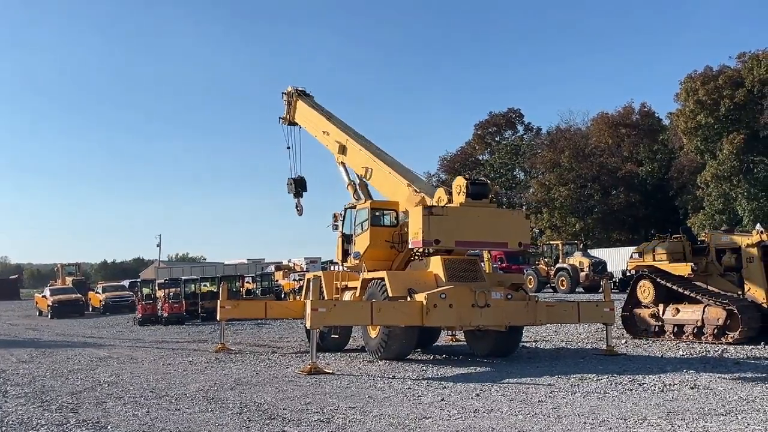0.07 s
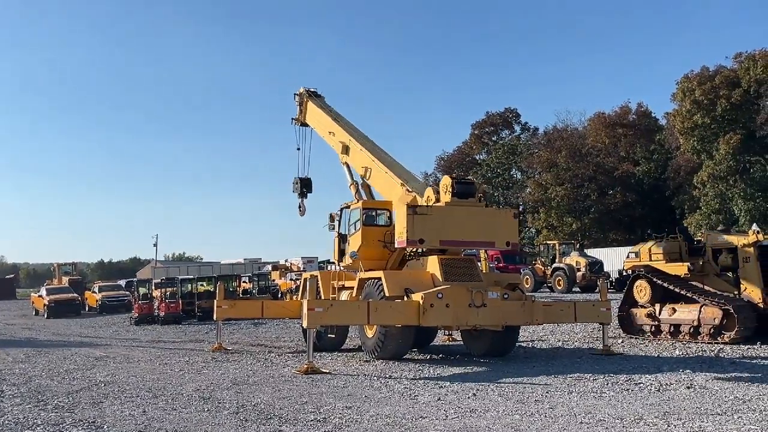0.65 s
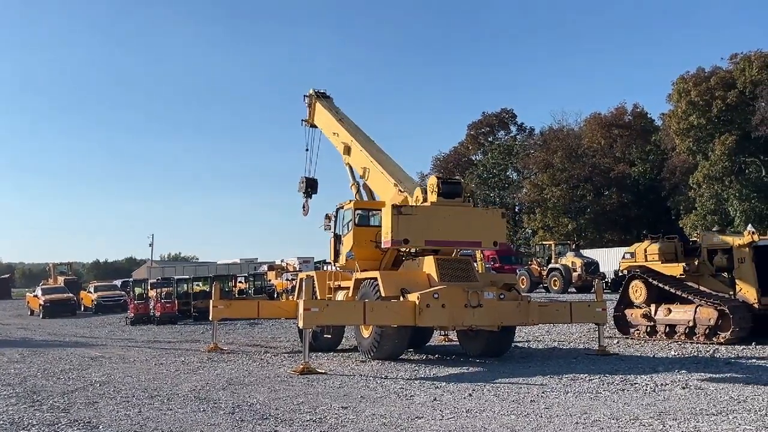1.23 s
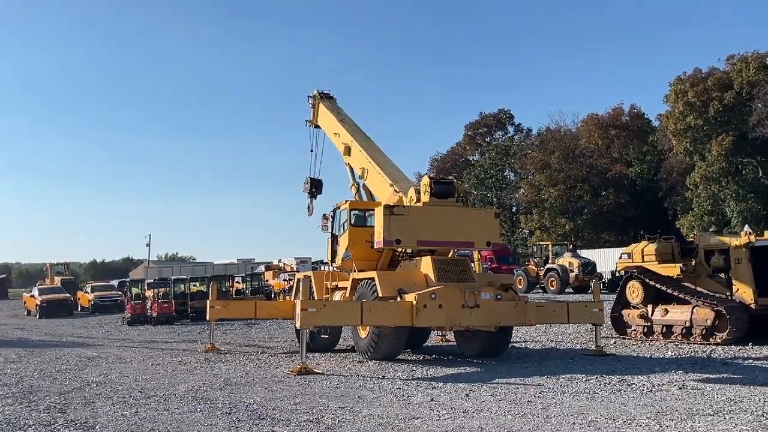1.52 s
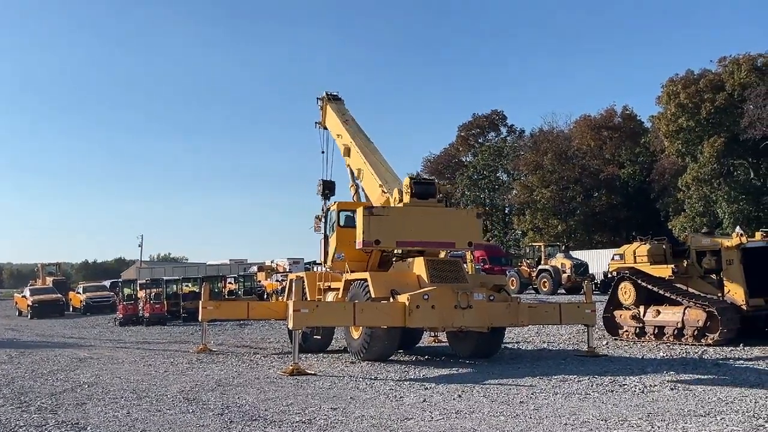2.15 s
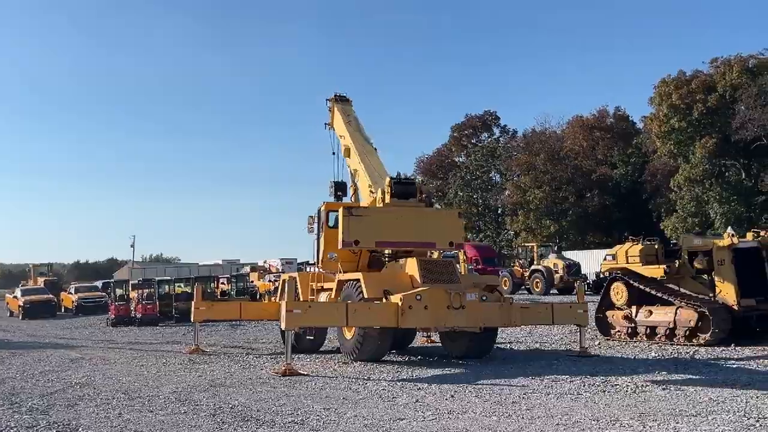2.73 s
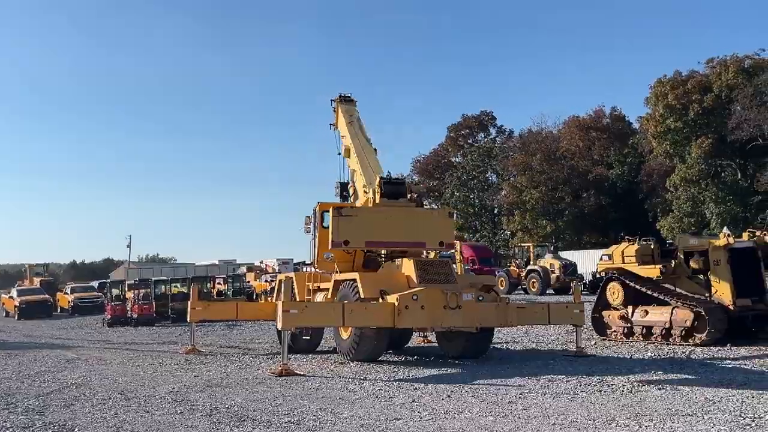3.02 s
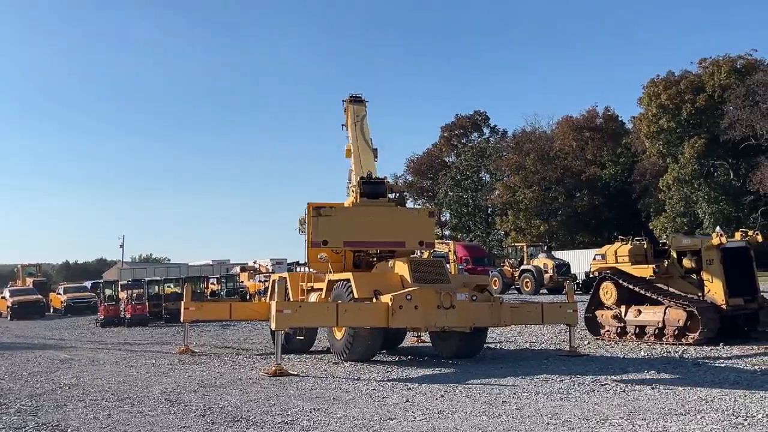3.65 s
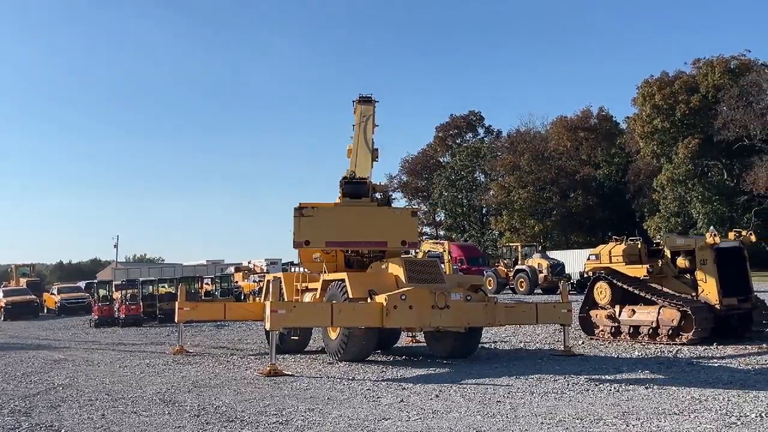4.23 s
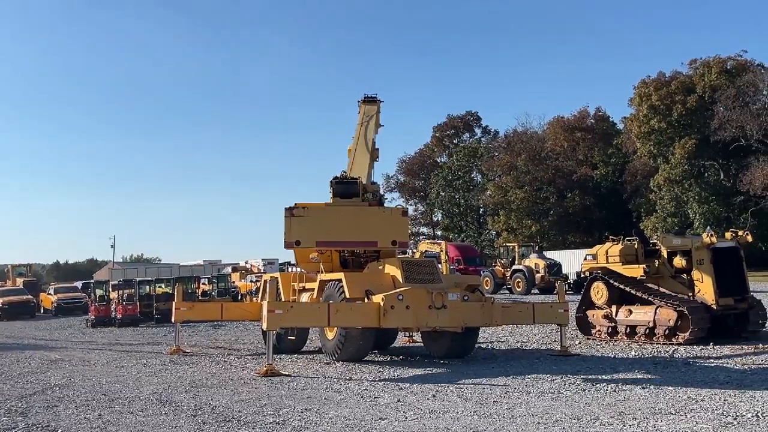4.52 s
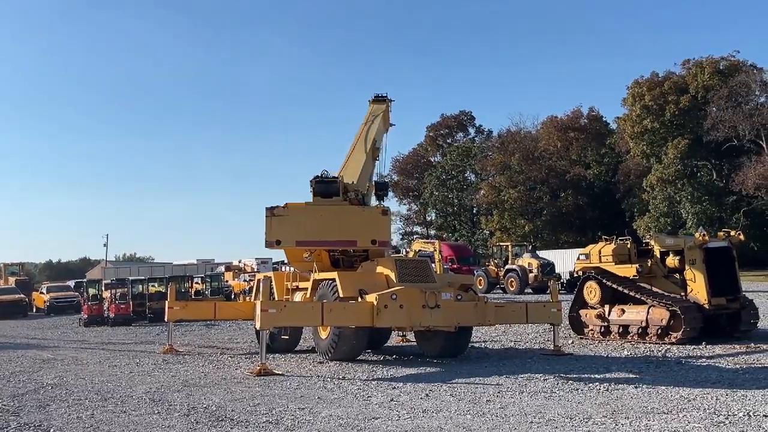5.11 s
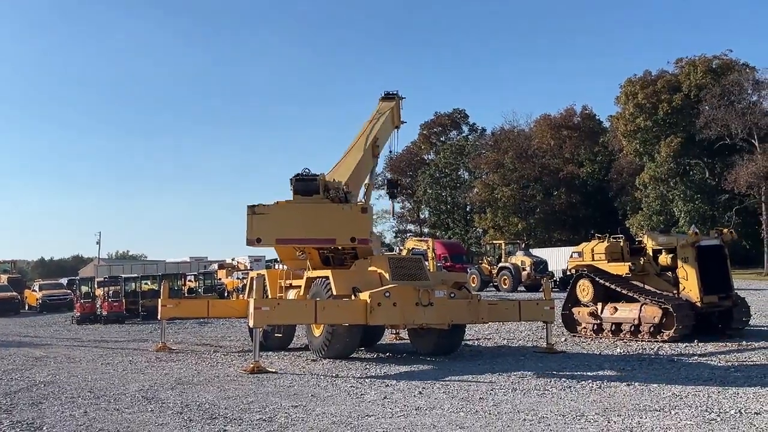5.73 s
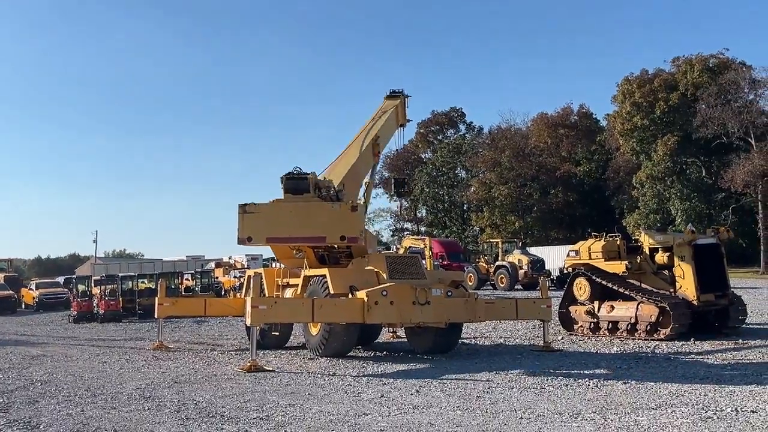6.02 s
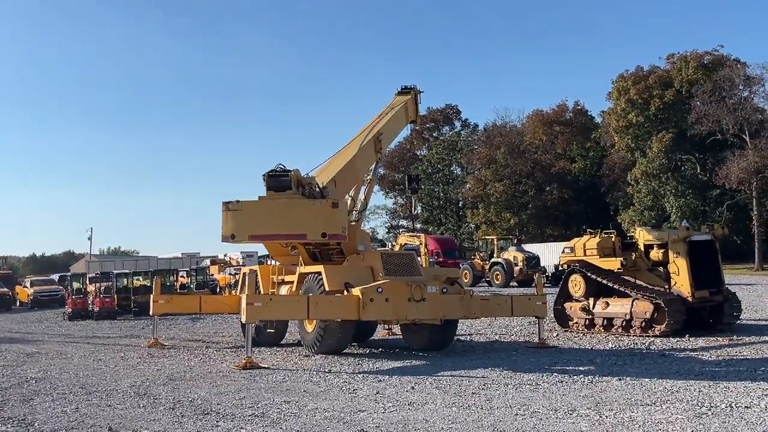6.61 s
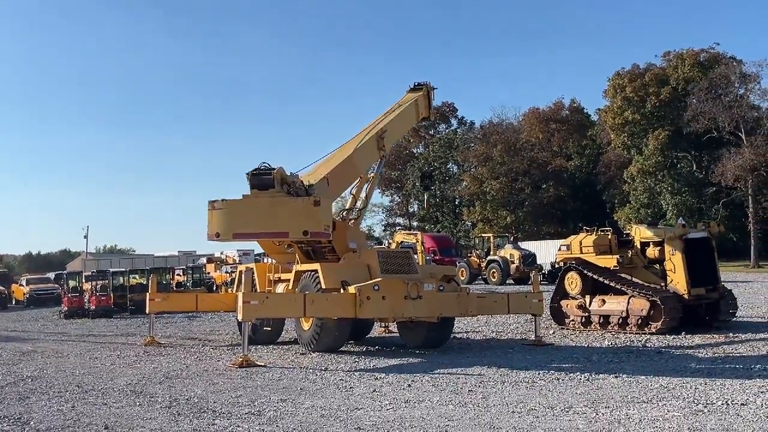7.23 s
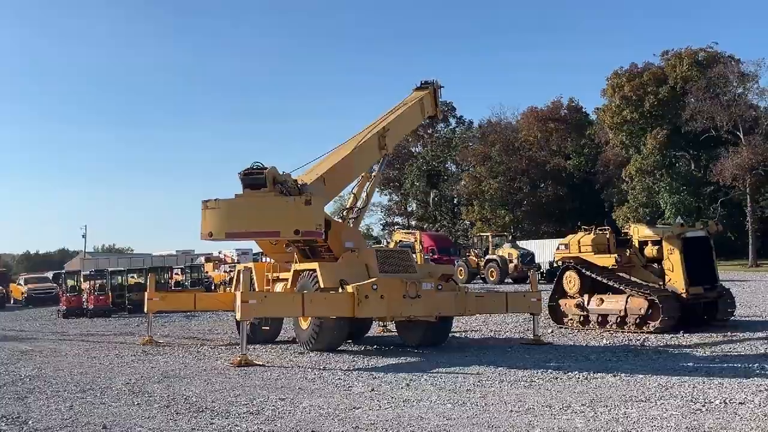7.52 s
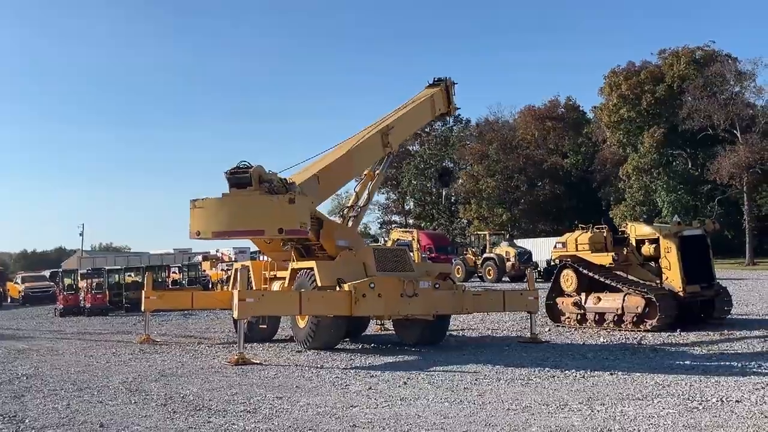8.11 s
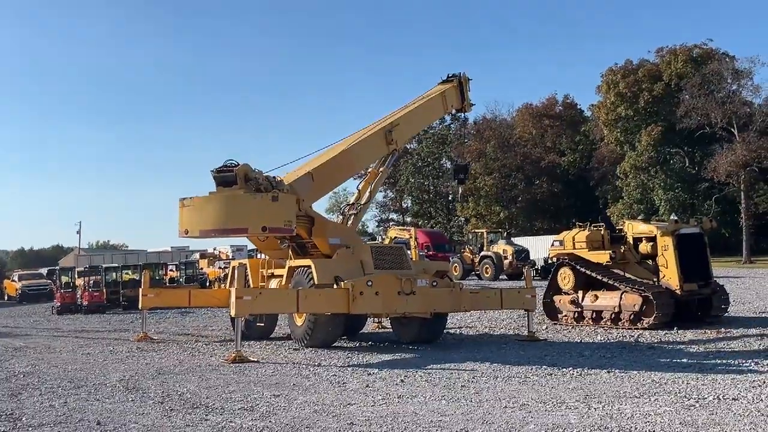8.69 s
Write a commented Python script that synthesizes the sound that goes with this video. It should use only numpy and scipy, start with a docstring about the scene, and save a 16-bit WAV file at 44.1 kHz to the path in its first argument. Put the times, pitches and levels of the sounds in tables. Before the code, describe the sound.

A mobile crane's diesel engine is already running at the start, with a deep exhaust drone and a fast metallic knocking clatter. Its pitch rises gradually, mostly over the first 3 seconds, creeps a little higher until about 5.5 seconds, then holds to the end at nearly 9 seconds. The drone is loudest in the first 1.5 seconds, weakest around 4 seconds, and partly returns by 6 seconds. A thin, high hydraulic whine climbs with the engine, swelling from about 2 seconds and peaking near 3.5 seconds. It stays prominent until 5 seconds, then recedes unevenly and is faint by 8 seconds. Underneath run a fan and pump hum, steady rushing air, a faint oil hiss and a slight ring from a metal cover. The pump hum grows a little in the last second. The place is an open yard with a short, weak echo.

```python
"""In an open gravel yard, a mobile crane swings round while its diesel speeds up, then holds its speed.
One crankshaft (the engine's main shaft) drives everything: six cylinders fire in turn, making the
exhaust drone and the engine block knock, while the cooling fan and the oil pump hum.
The pump's gears add a thin whine that swells as the deck turns. Behind it all, air rushes,
oil hisses in a valve and a metal cover rings."""
import sys
import numpy as np
from scipy import signal
from scipy.fft import rfft, irfft, next_fast_len
from scipy.io import wavfile
from scipy.ndimage import map_coordinates

SR = 44100
rng = np.random.default_rng(int(sys.argv[2]) if len(sys.argv) > 2 else 0)


def output_pcm(signal):
    """Save a mono or channel-first signal as 16-bit PCM at the path in sys.argv[1].

    Samples are clipped to [-1, 1] before scaling.
    """
    pcm = np.clip(np.atleast_2d(signal).T, -1, 1) * 32767
    wavfile.write(sys.argv[1], SR, np.round(pcm).astype(np.int16))


N = 390726

# Crankshaft speed: the throttle opens, then the speed settles. Columns: t/s, speed/(turns per s)
ENGINE_SPEED = [(0.0, 21.189), (0.48, 21.907), (1.1, 22.597), (1.49, 23.235), (2.01, 24.391),
                (2.67, 25.543), (3.45, 26.028), (4.48, 26.414), (5.02, 26.484), (5.55, 26.694),
                (6.94, 26.828), (8.86, 26.912)]
# Exhaust drone: loudest as the engine picks up, weakest in mid-swing. Columns: t/s, level/dB
DRONE_LEVEL = [(0.0, -9.5), (0.05, -13), (0.1, -14.5), (0.15, -11), (1.58, -12.5), (1.75, -14.5),
               (2.49, -15.5), (3.36, -16), (4.12, -21), (5.85, -16), (8.81, -16), (8.86, -16)]
# How hard the engine works, which lifts the knocking and the rush of air. Columns: t/s, level/dB
ENGINE_EFFORT = [(0, -0.2), (1.2, -0.9), (2.3, 1.1), (4, -0.5), (5.6, 0), (7, -0.1), (8.86, -1)]


def amp(db):
    """Turn decibels into a number to multiply a sound by."""
    return 10 ** (np.asarray(db) / 20)


def unit(x):
    """Scale a sound so that its average strength (rms) is 1."""
    return x / np.sqrt(np.mean(x ** 2) + 1e-20)


def along(points, hz):
    """Read a table of (f/Hz, value) at any frequency, on a logarithmic frequency scale."""
    freqs, values = np.transpose(points)
    return np.interp(np.log(hz + 1), np.log(freqs + 1), values)


def curve(rows):
    """Join the rows of a (t/s, value) table with straight lines, one value per sample."""
    return np.interp(np.arange(N) / SR, *np.transpose(rows))


def wobble(rate):
    """A smooth curve through `rate` random values a second."""
    times = np.linspace(0, N / SR, 2000)
    values = rng.standard_normal(1000)
    smooth = map_coordinates(values, [times * rate], mode="mirror")
    return np.interp(np.arange(N) / SR, times, smooth)


def filtered(x, response):
    """Multiply each frequency in a sound by response(hz)."""
    size = next_fast_len(N + SR // 2)
    hz = np.fft.rfftfreq(size, 1 / SR)
    return irfft(rfft(x, size) * response(hz), size)[..., :N]


def coloured(x, spectrum):
    """Shape a sound's bass and treble by a (f/Hz, level/dB) table, then scale it to strength 1."""
    return unit(filtered(x, lambda hz: amp(along(spectrum, hz))))


def noise(spectrum):
    """Fresh noise of strength 1, shaped by a (f/Hz, level/dB) table."""
    return coloured(rng.standard_normal(N), spectrum)


def tone(turns, db, flutter_db, flutter_rate):
    """A pure tone, one wave per turn of a spinning part, whose level flutters at random."""
    gain = amp(db + flutter_db * wobble(flutter_rate))
    return np.sqrt(2) * gain * np.sin(2 * np.pi * (turns + rng.random()))


def tones(turns, harmonics, flutter_db, flutter_rate):
    """Harmonics (tones at whole multiples of a turning speed), each fluttering on its own."""
    return sum(tone(k * turns, db, flutter_db, flutter_rate) for k, db in harmonics)


def doublings():
    """Engine speed counted in doublings: 0 at full speed, -1 at half speed."""
    speed = curve(ENGINE_SPEED)
    return np.log2(speed / speed.max())


def boom(per_turn, resonances):
    """The extra dB a tone gains as it slides through resonances, the pitches at which a part rings."""
    pitch = per_turn * curve(ENGINE_SPEED)
    return sum(lift / (1 + (2 * (pitch - hz) / width) ** 2) for hz, width, lift in resonances)


def hum(crank, per_turn, harmonics, resonances, flutter_db, flutter_rate):
    """A part driven by the crankshaft hums, louder with speed and where it meets a resonance."""
    growth_db = 17 * doublings()
    sound = np.zeros(N)
    for k, db in harmonics:
        waves_per_turn = k * per_turn
        level_db = db + growth_db + boom(waves_per_turn, resonances)
        sound += tone(waves_per_turn * crank, level_db, flutter_db, flutter_rate)
    return sound


def yard(x, fade_s=0.12):
    """Gravel and parked machines scatter back a short, weak echo, different on the left and right."""
    # How much sound comes back. Columns: f/Hz, level/dB
    scatter = [(80, -32), (200, -22), (500, -17), (700, -12), (1200, -15), (1700, -7), (2500, -20),
               (5000, -35)]
    t = np.arange(SR // 3) / SR
    tails = rng.standard_normal((2, len(t))) * np.exp(-np.log(1000) * t / fade_s)  # 60 dB down at fade_s
    echoes = signal.oaconvolve(x[None], tails / np.linalg.norm(tails[0]), axes=1)[:, :N]
    return filtered(echoes, lambda hz: amp(along(scatter, hz)))


def air(base_db=-34.5, effort_share=0.77):
    """Air rushes through the radiator, louder with speed and effort; some treble comes from all around."""
    # Tone colour of the rushing air. Columns: f/Hz, relative level/dB
    rush_colour = [(400, -7.5), (1000, 6), (1700, -3), (2400, 2.5), (2750, 0), (3100, -1.5), (3700, -1),
                   (4800, -3.5), (6700, -9.5), (8500, -18.5), (10500, -21), (14400, -36.5)]
    # The share that reaches each microphone by its own path. Columns: f/Hz, level/dB
    spread = [(2000, -14), (5000, -16), (6500, -9), (10000, -7), (14000, -5)]
    left_right = np.array([noise(rush_colour), noise(rush_colour)])
    around = filtered(left_right, lambda hz: amp(along(spread, hz)))
    flow_db = base_db + 8 * doublings() + effort_share * curve(ENGINE_EFFORT)
    return amp(flow_db + 0.38 * wobble(14)) * (noise(rush_colour) + around)


def valve(centre_hz=3100, width_hz=330, full_speed_db=-46):
    """Oil squeezed through a valve hisses in one narrow band, much louder as the pump speeds up."""
    hiss = filtered(rng.standard_normal(N), lambda hz: 1 / (1 + (2 * (hz - centre_hz) / width_hz) ** 2))
    return amp(full_speed_db + 35 * doublings() + 1.2 * wobble(4)) * unit(hiss)


def panel(crank, centre_hz=1340, width_hz=20, db=-40):
    """A sheet-metal cover sings whenever a harmonic of the firing slides through its resonance."""
    ring = np.zeros(N)
    speed = curve(ENGINE_SPEED)
    for per_turn in range(48, 66, 3):  # steps of three: the engine fires three times a turn
        off_pitch = (per_turn * speed - centre_hz) / (width_hz / 2)
        ring += np.sin(2 * np.pi * per_turn * crank - np.arctan(off_pitch)) / np.hypot(1, off_pitch)
    return np.sqrt(2) * amp(db + 2.4 * wobble(6.6)) * ring


def fan(crank, blades_per_turn=6.593):
    """Passing fan blades hum; the turning deck shields their lowest tone along with the exhaust drone."""
    # The blades' higher tones at full speed. Columns: harmonic, base level/dB
    blade_overtones = [(2, -39.5), (3, -38), (4, -47)]
    # Resonances of the fan's housing. Columns: f/Hz, width/Hz, lift/dB
    housing = [(284.4, 6.4, 11), (300, 4.8, 8), (332.6, 12, 12), (502.4, 27, 5.8)]
    drone_db = curve(DRONE_LEVEL)
    lowest_db = -33.5 + 1.7 * (drone_db - drone_db.mean())
    lowest = tone(blades_per_turn * crank, lowest_db, flutter_db=1.6, flutter_rate=6)
    return lowest + hum(crank, blades_per_turn, blade_overtones, housing, flutter_db=1.77, flutter_rate=5)


def pump(crank, strokes_per_turn=9.789):
    """The oil pump's quick strokes blend into a hum that follows its load."""
    # Tones of the strokes at full speed. Columns: harmonic, base level/dB
    stroke_tones = [(1, -32), (2, -41), (3, -44.5), (4, -48)]
    # Resonances of the pump's mounting. Columns: f/Hz, width/Hz, lift/dB
    mounting = [(212, 2.5, 6), (221, 8, 14), (245, 7, 11), (443, 10, 5), (523, 4, 6)]
    # What the changing load adds to the hum. Columns: t/s, level/dB
    load = [(0, -1), (3.3, 0), (7.5, -0.5), (8.86, 3.5)]
    strokes = hum(crank, strokes_per_turn, stroke_tones, mounting, flutter_db=1.63, flutter_rate=7)
    return amp(curve(load)) * strokes


def gears(crank, teeth_per_turn=46, echo_path_m=7.15, echo_db=-38.5):
    """The pump's gear teeth meet so fast that they whine; a parked machine echoes the sound."""
    # The whine swells and fades as the turning deck aims it past the listener. Columns: t/s, level/dB
    swell = [(0, -35), (1.2, -36.5), (2.2, -30.5), (3.6, -21.5), (4.3, -26), (5, -24.5), (5.7, -30),
             (6.8, -28), (7.85, -37.5), (8.3, -31), (8.86, -35)]
    # Tones of the meeting teeth. Columns: harmonic, relative level/dB
    tooth_tones = [(1, -1.5), (2, -25), (3, -31)]
    # Resonances of the gear case. Columns: f/Hz, width/Hz, lift/dB
    gear_case = [(1007, 14, 5), (1104, 14, 3), (1153, 14, 3)]
    throb = 1 + 0.13 * np.cos(np.pi * crank)  # once every two turns
    teeth = teeth_per_turn * crank + 0.017 * wobble(35)  # slack between the teeth makes them jitter
    # As the pitch climbs, the late echo strengthens and weakens the whine by turns.
    waves_late = teeth_per_turn * curve(ENGINE_SPEED) * echo_path_m / 343  # sound travels 343 m/s
    strength = np.abs(amp(curve(swell)) + amp(echo_db) * np.exp(-2j * np.pi * waves_late))
    whine = tones(teeth, tooth_tones[:1], flutter_db=0.24, flutter_rate=14)
    whine *= amp(boom(teeth_per_turn, gear_case))
    rasp = tones(teeth + 0.17 * wobble(70), tooth_tones[1:], flutter_db=1, flutter_rate=12)
    return throb * strength * (whine + rasp)


def block(crank, cylinders=6, ring_s=0.092, clatter_db=-28, blur_hz=1400):
    """Each firing knocks the engine block; every cylinder has its own ring, heard once in two turns."""
    # Tone colour of the metal block. Columns: f/Hz, relative level/dB
    metal_colour = [(250, -38), (450, -5.5), (660, -8.5), (800, -3), (880, 1.5), (960, -1.5), (1080, 0),
                    (1250, -3), (1450, -6.5), (1750, -8), (2050, -13), (2400, -14), (2700, -23),
                    (3500, -21), (7000, -48.5)]
    # Tones of the engine's valves and block. Columns: harmonic of the two-turn cycle, base level/dB
    metal_tones = [(46, -49.5), (61, -47.5), (64, -45), (75, -48), (78, -44.5), (81, -56.5)]
    firings = np.flatnonzero(np.diff(np.floor(crank * cylinders / 2)))
    t = np.arange(SR // 8) / SR
    fade = np.exp(-np.log(1000) * t / ring_s)  # 60 dB down at ring_s
    halves = rng.standard_normal((2, len(t)))  # the front and rear of the block fire in turn
    knock = np.zeros(N)
    for cylinder in range(cylinders):
        starts = firings[cylinder::cylinders]
        strengths = amp(1.5 * rng.standard_normal(len(starts)))
        blows = np.bincount(starts, strengths, N)
        ring = fade * (halves[cylinder % 2] + 1.4 * rng.standard_normal(len(t)))
        knock += signal.oaconvolve(blows, ring)[:N]
    # Only the low ring repeats; a random rattle takes over in the treble.
    knock = filtered(unit(knock), lambda hz: 1 / np.hypot(1, (hz / blur_hz) ** 2))
    pulsing = 1 + 0.1 * np.cos(2 * np.pi * crank) + 0.026 * np.cos(np.pi * crank)
    rattle = 1.32 * pulsing * rng.standard_normal(N)
    clatter = amp(clatter_db + curve(ENGINE_EFFORT)) * coloured(knock + rattle, metal_colour)
    speed = curve(ENGINE_SPEED)
    strain_db = 0.91 + 5 * (speed - speed.max())  # the tones come out only near full speed
    return clatter + amp(strain_db) * tones(crank / 2, metal_tones, flutter_db=4.0, flutter_rate=2.885)


def exhaust(crank, overtone_share=0.65):
    """The muffler lets out deep firing tones and a rumble of gas; unequal cylinders add an uneven beat."""
    # Tones of the firing. Columns: harmonic of the two-turn cycle, relative level/dB
    firing_tones = [(6, -0.5), (12, -16), (18, -25), (24, -41.5)]
    # Tones of the unequal cylinders at full speed. Columns: harmonic of the two-turn cycle, level/dB
    uneven_tones = [(7, -40.5), (9, -34.5), (10, -45)]
    # Tone colour of the swirling gas. Columns: f/Hz, relative level/dB
    gas_colour = [(20, -26), (35, -22), (52, -2), (95, -2.5), (135, -2), (190, -5.5), (320, -7),
                  (400, -14.5), (600, -11), (1000, -25), (2000, -47.5)]
    cycles = crank / 2  # each cylinder fires once in two turns
    drone_db = curve(DRONE_LEVEL)
    drone = amp(drone_db) * tones(cycles, firing_tones[:1], flutter_db=0.37, flutter_rate=26)
    steadier_db = drone_db.mean() + overtone_share * (drone_db - drone_db.mean())
    overtones = amp(steadier_db) * tones(cycles, firing_tones[1:], flutter_db=0.6, flutter_rate=9.8)
    uneven = amp(29 * doublings()) * tones(cycles, uneven_tones, flutter_db=1, flutter_rate=7)
    puffs = 1 + 0.37 * np.cos(2 * np.pi * 3 * crank)  # three a turn
    rumble = amp(-29) * unit(puffs * noise(gas_colour))
    return drone + overtones + uneven + rumble


def scene():
    """Run all the crane's parts from one crankshaft, then add the yard's echo and the rushing air."""
    crank = np.cumsum(curve(ENGINE_SPEED)) / SR  # turns made so far
    engine = exhaust(crank) + block(crank) + panel(crank)
    crane = engine + pump(crank) + gears(crank) + valve() + fan(crank)
    return crane + yard(crane) + air()


def record(dry, top_hz=14500):
    """Two microphones differ in tone colour and timing, and pick up nothing above top_hz."""
    # How much louder the left is than the right. Columns: f/Hz, level/dB
    balance = [(80, 0), (400, 1.9), (520, -4), (800, 0.5), (1050, -3), (1300, -0.5), (1570, -12), (1680, 0),
               (2000, 4.5), (2350, -0.5)]
    # How far the left wave trails the right. Columns: f/Hz, phase/rad
    left_lag = [(100, 0), (1250, .1), (1600, .9), (1720, 5), (2100, 6.3), (5200, 6.3), (5700, 7.2),
                (6700, 7.3), (8200, 9.3), (8900, 9.5), (11200, 12.4), (13000, 12.7), (14400, 14.8)]
    sides = np.array([[.5], [-.5]])  # left and right each take half the difference

    def microphones(hz):
        gain = amp(sides * along(balance, hz))
        delay = np.exp(-1j * sides * along(left_lag, hz))
        return gain * delay * (hz < top_hz)

    soft_ends = signal.windows.tukey(N, .0006)
    return filtered(dry * soft_ends, microphones)


dry = scene()
out = record(dry)
output_pcm(out)
```